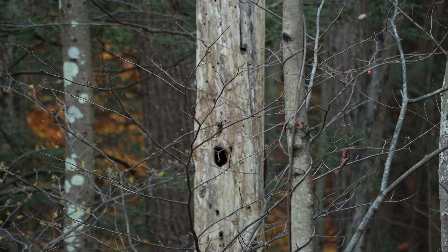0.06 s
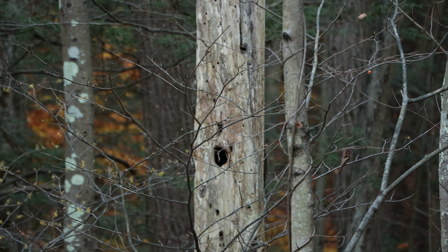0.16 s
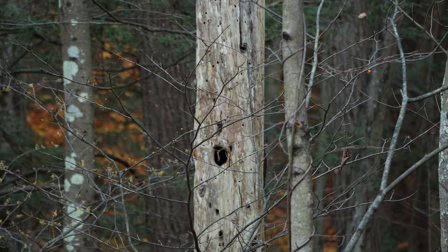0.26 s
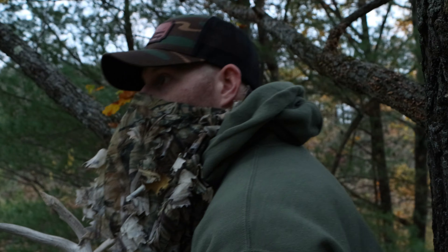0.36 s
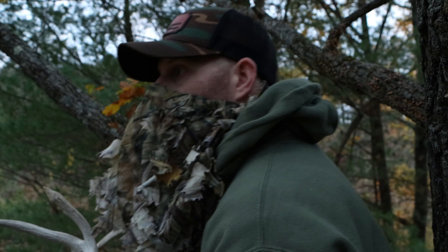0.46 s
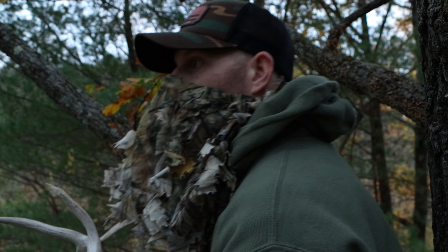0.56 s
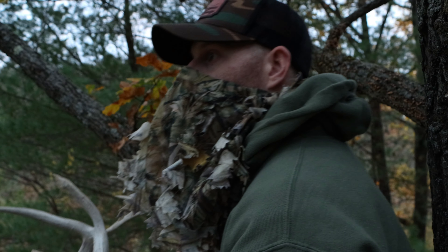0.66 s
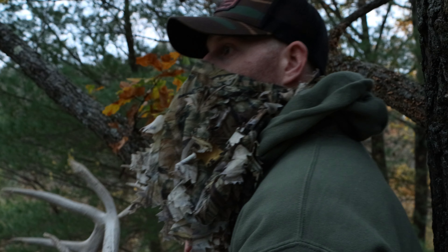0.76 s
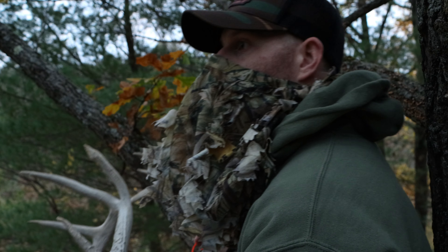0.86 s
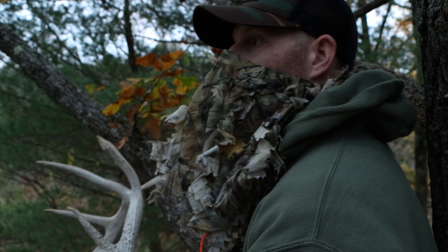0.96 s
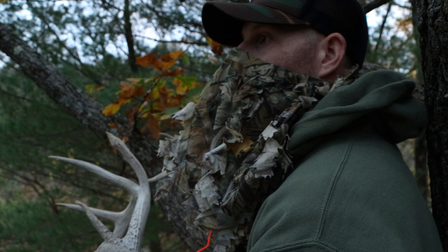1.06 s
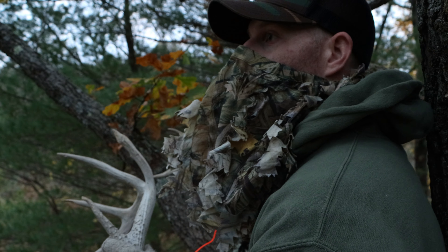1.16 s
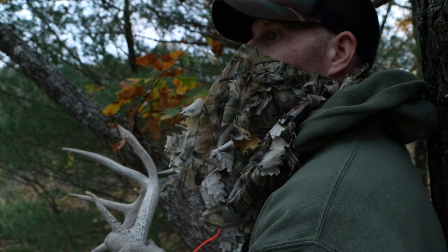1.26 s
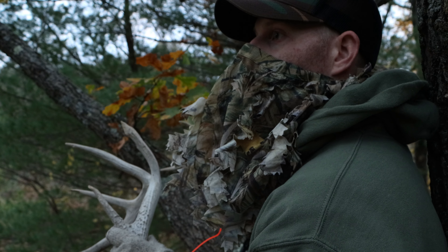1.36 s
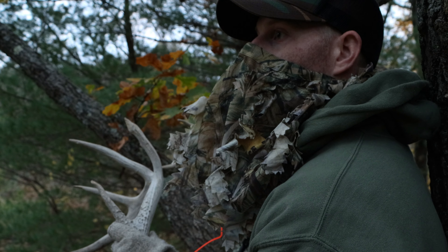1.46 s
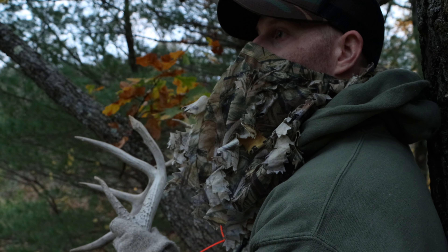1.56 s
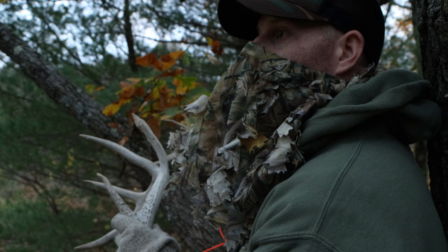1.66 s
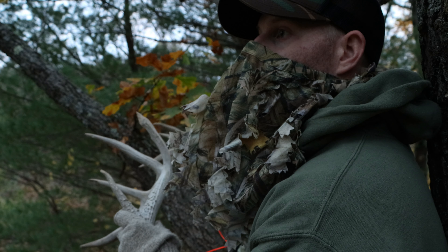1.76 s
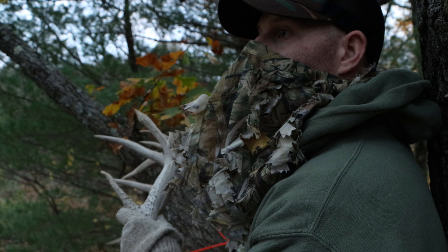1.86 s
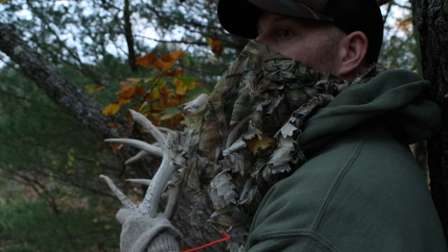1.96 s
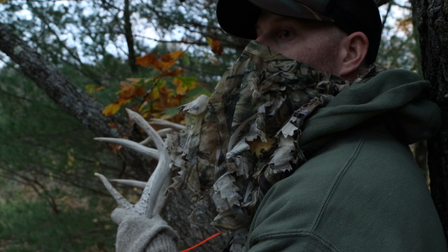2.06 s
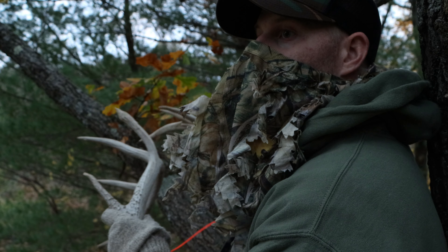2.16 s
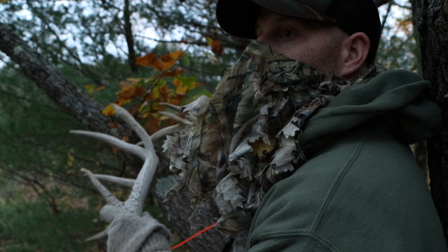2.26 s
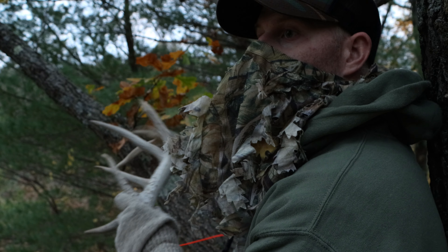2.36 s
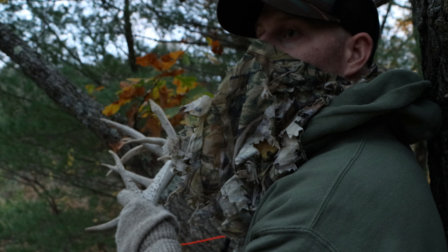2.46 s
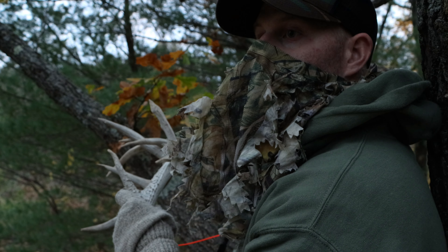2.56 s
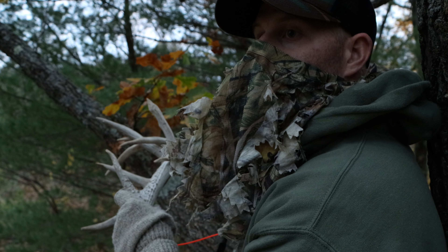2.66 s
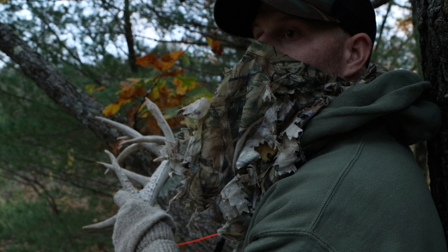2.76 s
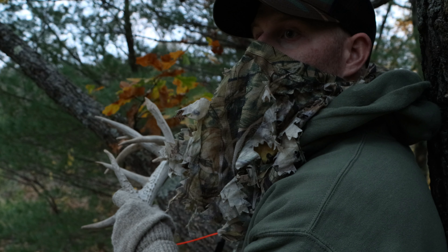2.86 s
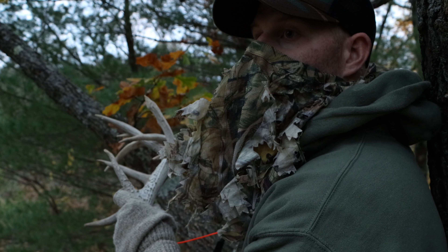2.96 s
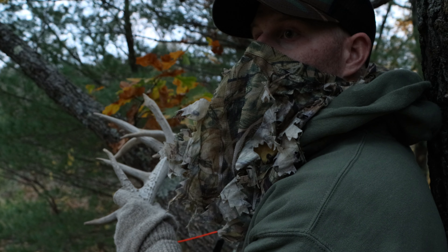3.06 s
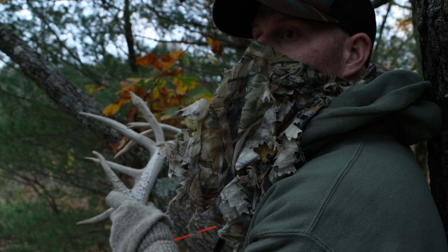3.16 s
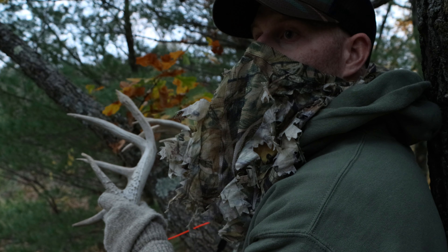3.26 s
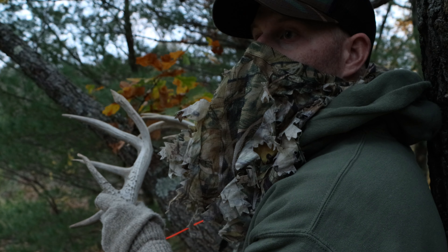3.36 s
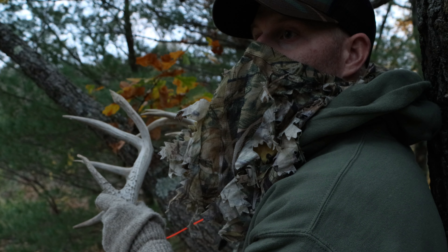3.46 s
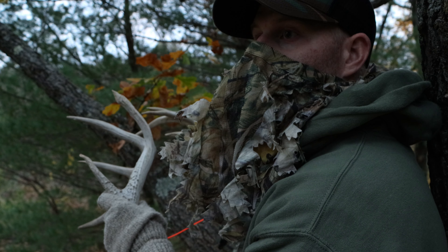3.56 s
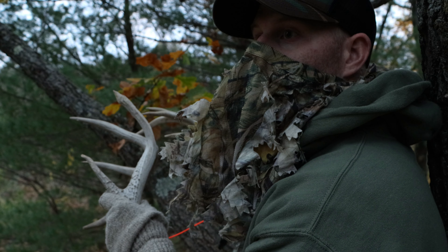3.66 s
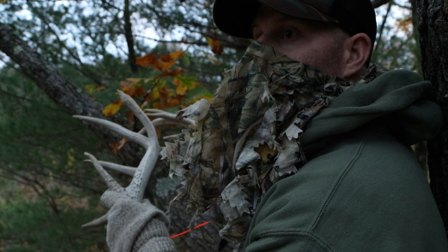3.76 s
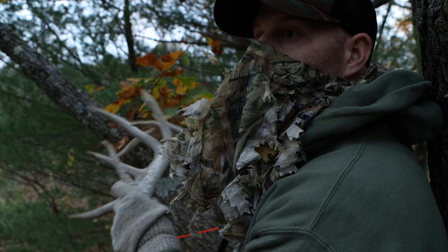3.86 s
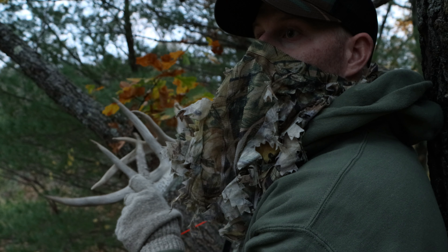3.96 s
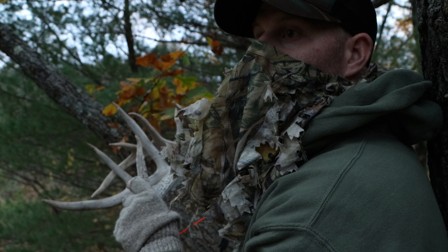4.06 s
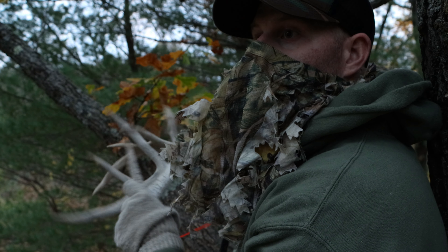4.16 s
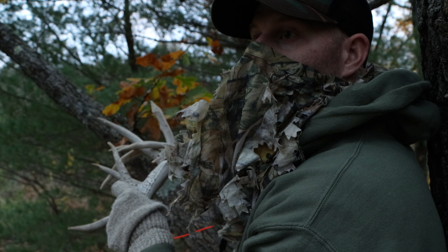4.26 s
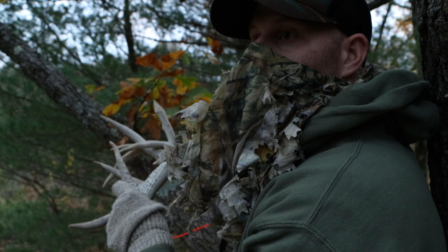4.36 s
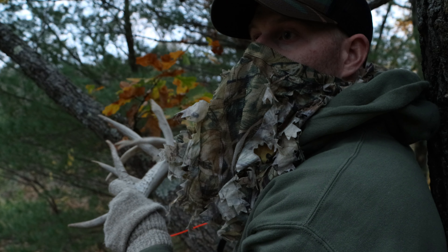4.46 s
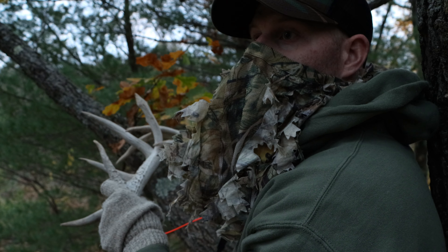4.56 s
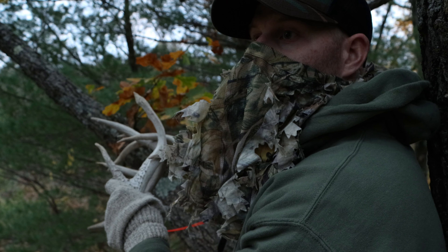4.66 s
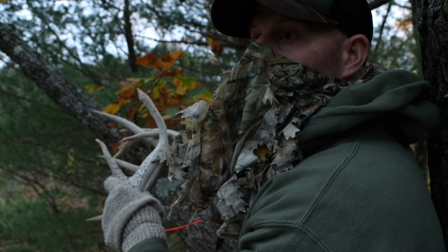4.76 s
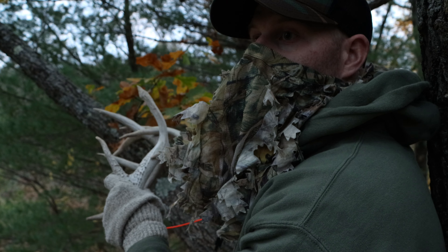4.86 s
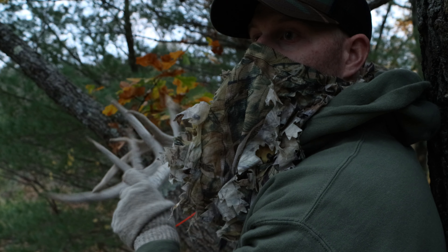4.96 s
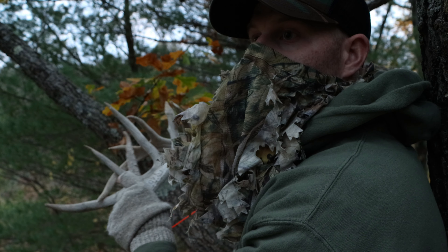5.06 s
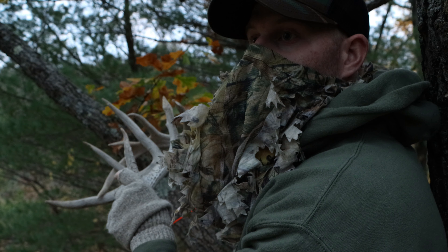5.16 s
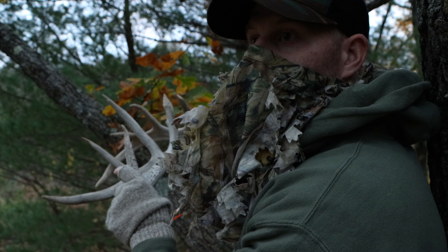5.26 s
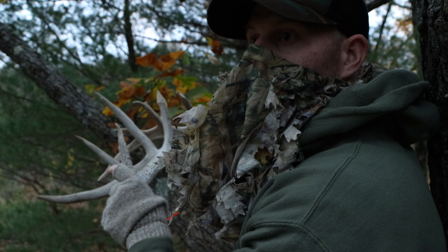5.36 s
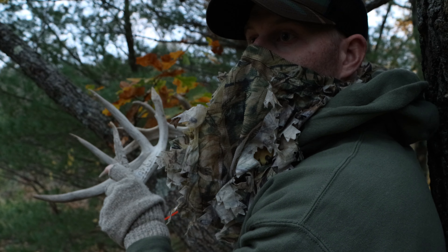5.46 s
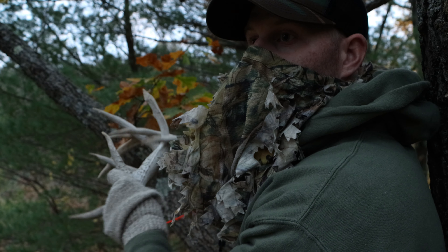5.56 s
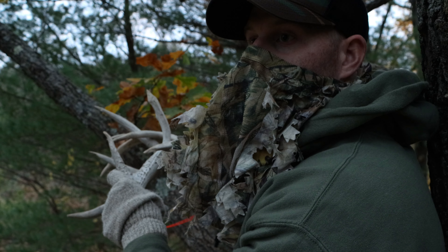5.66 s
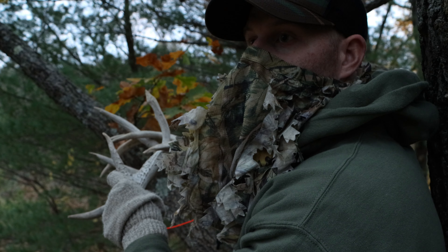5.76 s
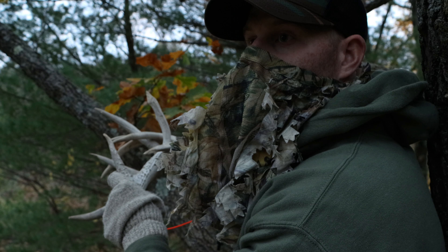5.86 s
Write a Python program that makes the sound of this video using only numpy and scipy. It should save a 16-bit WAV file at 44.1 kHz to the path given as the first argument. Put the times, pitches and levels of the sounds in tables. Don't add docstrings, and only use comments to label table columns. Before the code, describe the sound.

Close, dry antler rattling outdoors. Soft air and a fading distant hum fill a quiet wood after a brief noisier opening; a far bird chips barely audibly. A modest bony knock with light chatter comes first, then a hard bright crack, a long pause, a heavier softer clash, a brief drag, bright rattling, another hard clash and a final loudest clack. The ringing dies in milliseconds, with very little echo.

```python
import sys
import numpy as np
from scipy import signal
from scipy.fft import rfft, irfft
from scipy.io import wavfile
from scipy.ndimage import uniform_filter1d

SR = 44100
rng = np.random.default_rng(int(sys.argv[2]) if len(sys.argv) > 2 else 0)


def dump(signal):
    limited = np.clip(np.atleast_2d(signal).T, -1, 1)
    pcm = np.round(limited * 32767).astype(np.int16)
    wavfile.write(sys.argv[1], SR, pcm)


def boost_factor(decibels):
    exponent = np.asarray(decibels, float) / 20
    return 10 ** exponent


N = 260631

# frequency in Hz, density in dB per Hz.
OPENING_TONE = [(12, -33), (20, -2.5), (96, -4.5), (139, -7.5), (323, -11.5), (361, -18), (393, -8.5),
                (521, -9), (816, -2), (1140, -12.5), (1320, -11.5), (4280, -26.5), (8890, -29.5),
                (15200, -38), (16500, -51)]
# start in seconds, peak in dB, centre in Hz.
LEAF_TICKS = [(0.0094, -57, 12200), (0.0894, -68, 4120), (0.112, -61, 4940), (0.1384, -58, 9050),
              (0.147, -51, 8900), (0.1594, -60, 6520), (0.214, -55, 5440), (0.228, -55, 9670),
              (0.2444, -60, 5390), (0.2894, -59, 8530), (0.3084, -60, 4830), (0.3214, -55, 8540),
              (0.3583, -58, 6130)]
# frequency in Hz, density in dB per Hz.
WOOD_TONE = [(12, -38.5), (20, -7.5), (53, -2.5), (82, -2), (195, -1.5), (258, -4.5), (351, -4),
             (382, -6.5), (440, -5.5), (794, -4), (888, -3), (2970, -19), (12100, -25), (15200, -25.5),
             (16500, -43)]
# start in seconds, level in dB, start pitch in Hz, top pitch in Hz, length in seconds.
BIRD_CHIPS = [
    (0.746, -74, 5300, 7220, 0.022),
    (3.707, -68.5, 5520, 7250, 0.021),
    (5.263, -88.5, 6840, 7050, .14),
]
# frequency in Hz, level in dB, T60 in seconds.
BEAM_MODES = [(237, -12.5, 0.061), (310, -13, 0.043), (478.3, -9.5, 0.057), (594, 2.5, 0.014),
              (870, 3.5, 0.024), (1050, 1, 0.037)]
THICK_MODES = [(1260, -12, 0.05), (1425, -2, 0.022), (1800, -3.5, 0.022), (2045, -6.5, 0.024),
               (2449, -3, 0.026)]
THIN_MODES = [(2790, 4, .018), (3130, 5, 0.012), (3630, 2.5, 0.012), (4180, -1, 0.014), (4650, -4, .013),
              (4977, -4, 0.014)]
TIP_MODES = [(5440, 3.5, 0.012), (6210, -5, 0.011), (7380, 3.5, 0.005), (7850, 3.5, 0.01),
             (8500, -7, 0.0065), (9670, 2, .006), (11200, -1.5, 0.0024), (12400, -6.5, 0.00094)]
# rise in seconds, grit centre in Hz,
# grit width in octaves, grit level in dB, grit T60 in seconds, trim in dB.
PART_CONTACTS = [(0.0011, 550, 2.2, -0.5, 0.05, 0.5), (0.00046, 1700, 1.25, -4, 0.0081, 0.5),
                 (0.00025, 3800, 1.2, -4.5, 0.0049, 2), (0.000048, 9300, 1.4, -1, 0.0048, 2.5)]
# start in seconds, beam level in dB,
# hardness of taps in dB, free tines as pairs of Hz and dB.
GRIPS = [
    (1.9, 5.5, -5.5, [(783, -7), (1050, -1), (2190, 2), (2720, -3), (3130, -5.5)]),
    (2.48, -1, -12, [(560, -8.5), (880, 3), (1424, 2.5), (1750, 1.5), (3200, -0.5), (4960, 1)]),
    (4.0, 6, -27.5, [(850, 7.5), (1745, -2), (2370, -7), (2680, 2.5), (4150, 0.5)]),
    (4.2, 8.5, -17.5, [(870, 8.5), (1270, -15), (2700, -16.5), (3850, 0)]),
    (4.68, 0, -14, [(1390, -4.5), (2450, -1.5), (3100, -2.5), (4150, 5)]),
    (4.97, -1.6, -21.5, [(870, 4), (2170, 6), (2600, -5), (4200, 4)]),
    (5.084, -6.5, -15, [(860, -5), (2450, 4), (4200, 4)]),
    (5.6, 0.5, -15, [(890, 6.5), (1765, -2), (2780, 4.5), (3130, 1.5)]),
]
# start in seconds, peak in dB, hardness as dB of the tips against the peak,
# struck tine in Hz.
BLOWS = [(1.9163, -25, -3.5, 3130), (1.9501, -32.5, -3, 2220), (2.4928, -20, -14.5, 1458),
         (2.4993, -10.5, 0.5, 4840), (2.5027, -11, -11, 3170), (2.5079, -19, -3, 3210),
         (2.5166, -26, -9, 2433), (2.5251, -29, -10.5, 3280), (2.54, -31.5, -20, 1420),
         (4.0251, -12, -14, 2765), (4.0294, -16.5, -12.5, 1740), (4.0453, -23, -15.5, 2390),
         (4.0626, -32.5, -24.5, 2350), (4.3085, -24, -9.5, 3870), (4.3138, -30, -30, 1300),
         (4.6966, -34.5, -16, 2860), (4.7459, -18.5, 4.5, 4130), (4.7614, -13.5, -2.5, 4000),
         (4.7661, -23, -10.5, 4140), (4.7786, -27.5, -17, 2700), (5.0369, -10.5, 0, 2280),
         (5.0524, -16, -12.5, 2676), (5.066, -22.5, -17.5, 2660), (5.0762, -28, -25.5, 1260),
         (5.088, -15.5, -5, 4180), (5.1089, -25.5, -22, 4330), (5.6355, -17.5, -12, 2770),
         (5.6414, -5, -6, 2877), (5.6444, -12, -25, 1790), (5.6506, -22.5, -21.5, 1713)]
# start in seconds, peak in dB, struck tine in Hz.
TAPS = [(1.963, -38.5, 1390), (1.9707, -42, 2320), (1.977, -47, 2400), (1.9834, -51, 2290),
        (1.9938, -51, 2420), (2.0083, -55, 1890), (2.0443, -59.5, 4000), (2.1254, -60.5, 2100),
        (2.5195, -26.5, 1670), (2.5488, -41.5, 1250), (4.0803, -37, 1430), (4.0903, -37.5, 1310),
        (4.1021, -33, 2405), (4.1067, -42.5, 2500), (4.1157, -49, 1330), (4.2321, -38.5, 1340),
        (4.2644, -50, 3940), (4.2866, -31.5, 1210), (4.2956, -36.5, 1174), (4.3474, -45, 1780),
        (4.718, -38.5, 1390), (4.7286, -39, 3580), (4.7369, -36, 1190), (4.7525, -27, 2000),
        (4.814, -46.5, 4140), (4.8261, -45.5, 1290), (4.9898, -49, 1420), (5.663, -38, 1240),
        (5.6784, -38, 1800), (5.6893, -41.5, 1600)]
# centre in Hz, level in dB, T60 in seconds.
TRUNK_HAZE = [(390, -61, 0.11), (930, -47.5, .3), (1810, -58.5, 0.3), (3080, -56.5, 0.61),
              (4800, -51, 0.39), (7960, -51.5, 0.3), (12250, -53.5, 0.23)]
# time in seconds, level in dB.
CHATTER_CURVE = [
    (1.955, -71),
    (1.975, -52),
    (2.0, -55.5),
    (2.05, -60.5),
    (2.1, -69),
    (2.16, -73),
]
# start in seconds, peak in dB.
LOW_JOLTS = [
    (2.505, -62.5),
    (4.035, -65),
    (4.281, -59.5),
    (4.758, -59.5),
    (5.045, -52),
    (5.645, -65),
]
# time in seconds, level in dB.
SCRAPE_CURVE = [
    (4.238, -54.5),
    (4.256, -52.5),
    (4.294, -43.5),
    (4.318, -32.5),
    (4.33, -69),
]

CUT_S, HUM_HZ = 0.362, 358


def seconds(length_s):
    return np.arange(int(length_s * SR)) / SR


def decay(t, t60_s):
    return np.exp(-np.log(1000) * t / t60_s)


def add(out, start_s, piece):
    i = int(start_s * SR)
    out[i:i + len(piece)] += piece[:len(out) - i]


def peak(x, db):
    return x * boost_factor(db) / np.abs(x).max()


def band(x, hz, octaves):
    edges = hz * 2 ** (-octaves / 2), min(hz * 2 ** (octaves / 2), SR / 2.1)
    return signal.sosfilt(signal.butter(2, edges, "bandpass", fs=SR, output="sos"), x)


def walk(rate_hz):
    k = int(SR / rate_hz)
    steps = np.repeat(rng.standard_normal(N // k + 1), k)
    return 0.99 * uniform_filter1d(uniform_filter1d(steps, k), k)[:N]


def air(tone, db, flicker_db):
    hz = np.maximum(np.fft.rfftfreq(N, 1 / SR), 1)
    tone_hz, tone_db = np.transpose(tone)
    noise = rfft(rng.standard_normal(N)) * boost_factor(np.interp(np.log(hz), np.log(tone_hz), tone_db))
    octave = np.log2(hz / 25)
    out = np.zeros(N)
    for k in range(11):
        share = np.clip(1 - np.abs(octave - k), 0, 1)
        out += irfft(noise * share, N) * boost_factor(flicker_db * walk(3.8))
    return out * boost_factor(db) / np.std(out)


def leaf_ticks():
    out, t = np.zeros(N), seconds(0.007)
    for start_s, db, hz in LEAF_TICKS:
        snap = rng.standard_normal(len(t)) * np.exp(-t / 0.0015)
        add(out, start_s, peak(band(snap, hz, 0.3), db - 4))
    return out


def opening():
    t = np.arange(N) / SR
    hum = boost_factor(-69 + 3.3 * walk(4.8)) * np.sin(2 * np.pi * HUM_HZ * t)
    return air(OPENING_TONE, -59, flicker_db=0) + hum + leaf_ticks()


def woodland():
    t = np.arange(N) / SR
    hum = boost_factor(-75.5 - 2.9 * t) * np.sin(2 * np.pi * HUM_HZ * t)
    return air(WOOD_TONE, -68.5, flicker_db=0.6) + hum


def bird():
    glide_s, echo_db, echo_t60_s = 0.016, -25, 0.45
    out = np.zeros(N)
    for start_s, db, start_hz, top_hz, length_s in BIRD_CHIPS:
        t = seconds(length_s)
        hz = top_hz + (start_hz - top_hz) * np.clip(1 - t / glide_s, 0, 1) ** 1.5
        swell = np.sin(np.pi * t / length_s) ** 0.5
        add(out, start_s, boost_factor(db) * np.sin(2 * np.pi * np.cumsum(hz) / SR) * swell)
    t = seconds(0.5)
    smear = boost_factor(echo_db) * rng.standard_normal(len(t)) * decay(t, echo_t60_s)
    return out + signal.fftconvolve(out, smear)[:N]


def grip(s):
    return [g for g in GRIPS if g[0] <= s][-1]


def contacts():
    hits = list(BLOWS)
    for s, db, hz in TAPS:
        hits.append((s, db, grip(s)[2], hz))
    rows = []
    for s, db, hardness_db, hz in hits:
        lean_db = 8.5 * np.log2(hz / 2350)
        beam_db = -17.5 + 0.8 * db + grip(s)[1]
        thick_db, thin_db = db - max(lean_db, 0), db + min(lean_db, 0)
        rows.append((s, hz, (beam_db, thick_db, thin_db, db + hardness_db)))
    return rows


def in_part(mode_hz, hz, octaves):
    return abs(np.log2(mode_hz / hz)) < octaves / 2


def struck(mode_hz, hz, octaves):
    return [(mode_hz, 7.5, 0.018)] if in_part(mode_hz, hz, octaves) else []


def freed(s, hz, octaves):
    boost_db, t60_at_1khz_s = 3, 0.041
    return [(f, boost_db + db, t60_at_1khz_s * (1000 / f) ** 0.83)
            for f, db in grip(s)[3] if in_part(f, hz, octaves)]


def sounding(*sets):
    same_tine_octaves = 0.09
    kept = []
    for modes in sets:
        kept = kept + [m for m in modes
                       if all(abs(np.log2(m[0] / k[0])) > same_tine_octaves for k in kept)]
    return kept


def ring(modes, scatter_db, detune, rise_s):
    t = seconds(0.12)
    hz, db, t60_s = np.transpose(modes)[:, :, None]
    strength, pitch, side = rng.standard_normal((3, len(modes), 1))
    level = np.sign(side + 0.6) * boost_factor(db + scatter_db * strength)
    waves = level * np.sin(2 * np.pi * hz * (1 + detune * pitch) * t)
    return (waves * decay(t, t60_s)).sum(axis=0) * (1 - np.exp(-t / rise_s))


def antlers():
    out, touches = np.zeros(N), np.zeros(N)
    t = seconds(0.12)
    knocks = contacts()
    noise = rng.standard_normal((len(knocks), len(t)))
    parts = zip((BEAM_MODES, THICK_MODES, THIN_MODES, TIP_MODES), PART_CONTACTS)
    for k, (modes, (rise_s, hz, octaves, grit_db, grit_t60_s, trim_db)) in enumerate(parts):
        fade = decay(t, grit_t60_s) + boost_factor(-28.5) * decay(t, 0.077)
        grit = band(noise * fade * (1 - np.exp(-t / rise_s)), hz, octaves)
        touch = (-1) ** k * band(np.exp(-t * SR * 2), hz, octaves)
        for (s, struck_hz, levels_db), g in zip(knocks, grit):
            alive = sounding(struck(struck_hz, hz, octaves), freed(s, hz, octaves), modes)
            rings = ring(alive, scatter_db=2.5, detune=0.012, rise_s=rise_s)
            knock = peak(rings, 0) + peak(g, grit_db)
            add(out, s, peak(knock, levels_db[k] + trim_db))
            add(touches, s, peak(touch, levels_db[k]))
    edges = signal.butter(3, (170, 14300), "bandpass", fs=SR, output="sos")
    return signal.sosfilt(edges, out), signal.sosfilt(edges, touches)


def trunks(x):
    t = seconds(0.8)
    haze = np.zeros(len(t))
    for hz, db, t60_s in TRUNK_HAZE:
        haze += boost_factor(db) * band(rng.standard_normal(len(t)), hz, 1) * decay(t, t60_s)
    return signal.fftconvolve(x, haze * (1 - np.exp(-(t / 0.0087) ** 2)))[:N]


def slips(curve, density, colour):
    s, db = np.transpose(curve)
    level = boost_factor(np.interp(np.arange(N) / SR, s, db, left=-200, right=-200))
    grains = rng.standard_normal(N) * (rng.random(N) < density) * level
    return sum(boost_factor(gain_db) * band(grains, hz, octaves) for hz, octaves, gain_db in colour)


def chatter():
    return slips(CHATTER_CURVE, 0.17, ((1480, 1.0, 8.6), (4000, 0.72, 7.4), (7160, 0.27, 4.2)))


def jolts():
    out, t = np.zeros(N), seconds(0.2)
    for start_s, db in LOW_JOLTS:
        wobble = rng.standard_normal(len(t)) * np.exp(-t / 0.027)
        add(out, start_s, peak(band(wobble, 60, 2.1), db))
    return out


def scrape():
    colour = ((764, 0.57, 22), (1670, 2.1, 16), (3770, 0.077, 13), (4000, 2.3, -7), (8150, 0.9, -5))
    return boost_factor(-4.5) * slips(SCRAPE_CURVE, 0.12, colour)


def scene():
    before = np.clip((CUT_S - np.arange(N) / SR) / 0.0024, 0, 1)
    place = before * opening() + (1 - before) * woodland()
    chips = bird()
    knocks, touches = antlers()
    haze = trunks(boost_factor(1.5) * touches + boost_factor(-20) * knocks)
    return (place + chips + knocks + haze + chatter() + jolts() + scrape())[None]


def roll_off(x):
    return signal.sosfilt(signal.butter(12, 16950, fs=SR, output="sos"), x)


def record(dry):
    rounded = 0.9 * np.tanh(dry / 0.93)
    top = signal.ellip(10, 0.2, 80, 16600, fs=SR, output="sos")
    mix = signal.sosfilt(top, rounded)
    return roll_off(mix)


dry = scene()
out = record(dry)
dump(out)
```